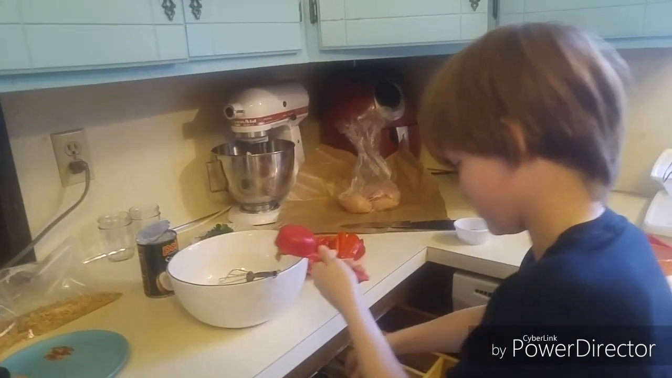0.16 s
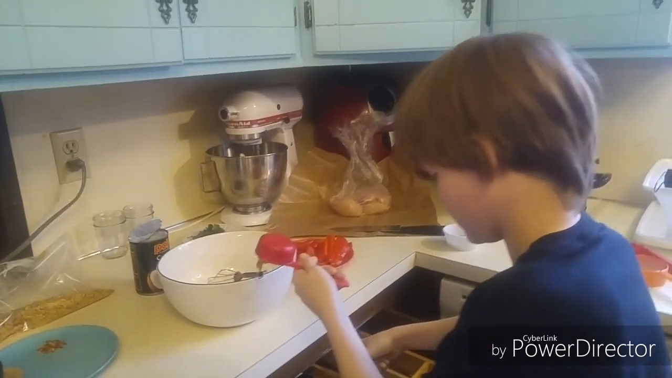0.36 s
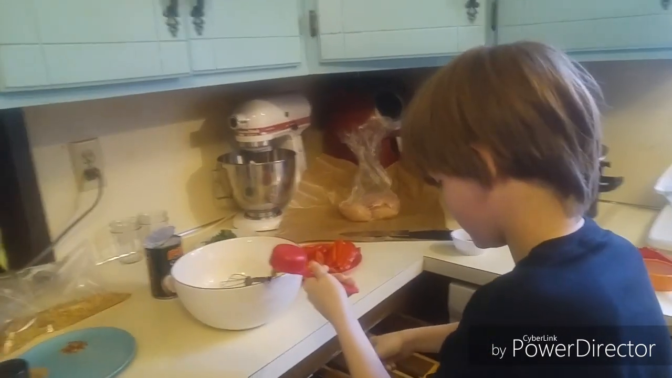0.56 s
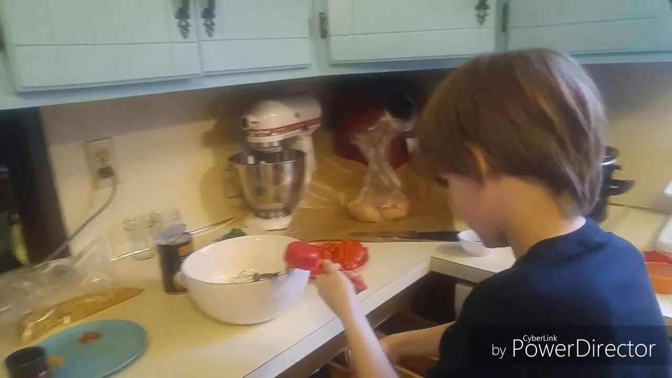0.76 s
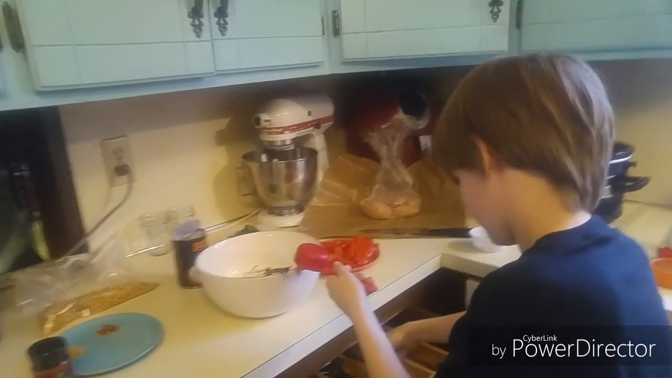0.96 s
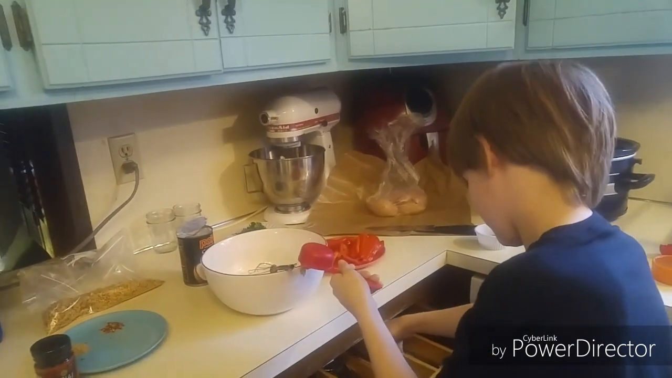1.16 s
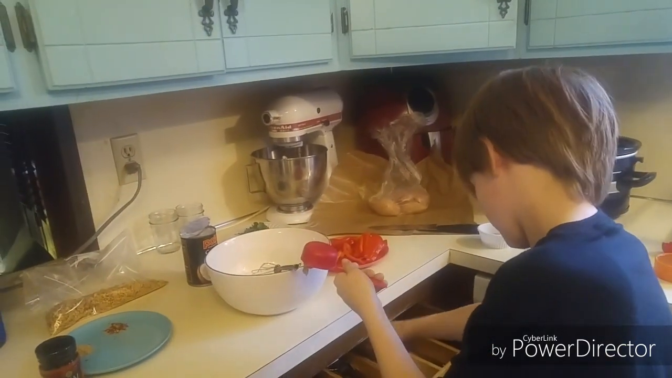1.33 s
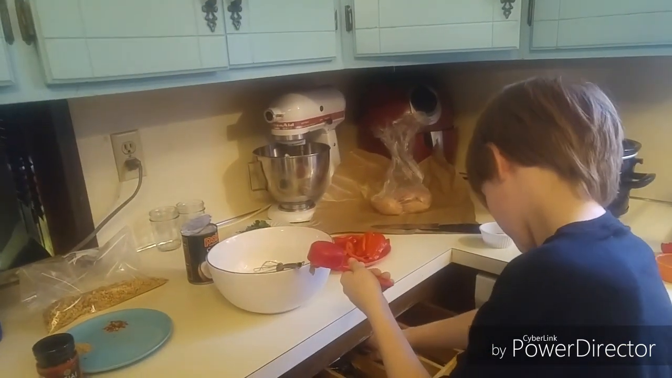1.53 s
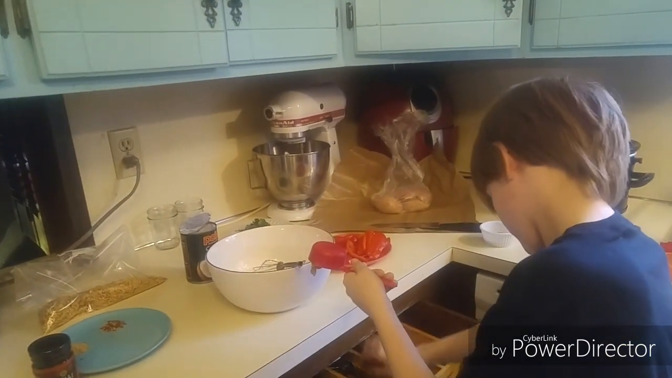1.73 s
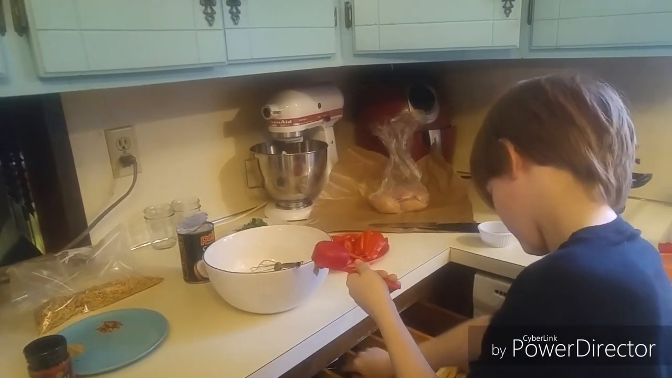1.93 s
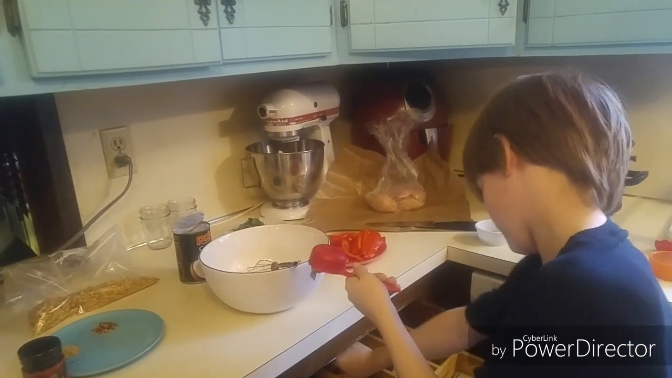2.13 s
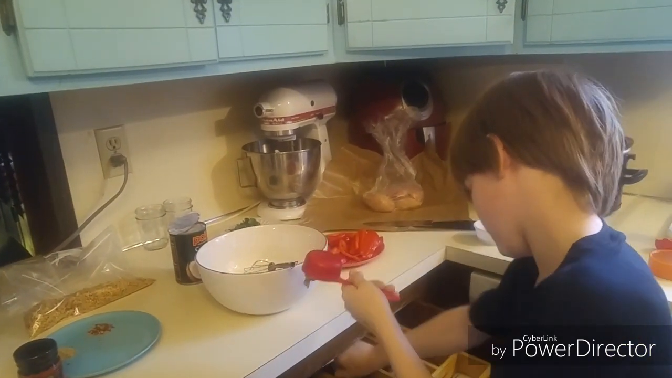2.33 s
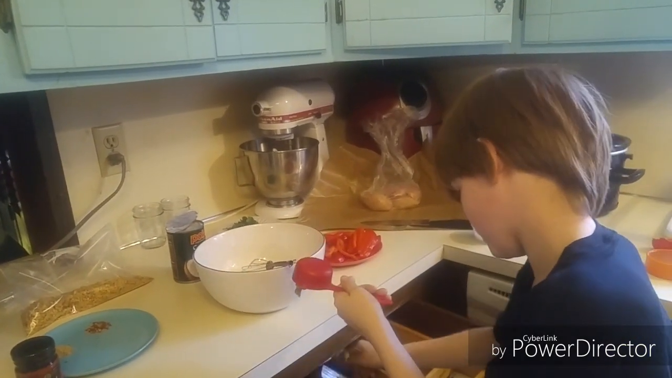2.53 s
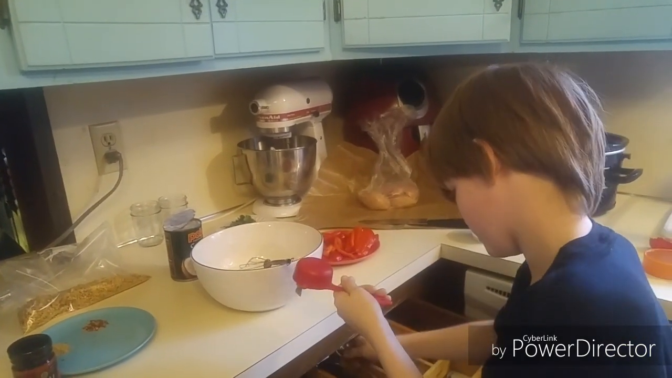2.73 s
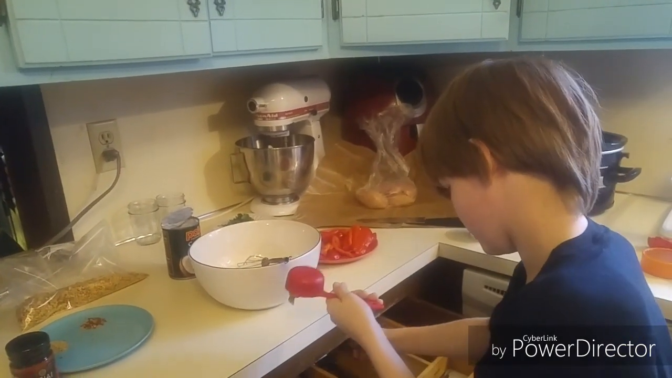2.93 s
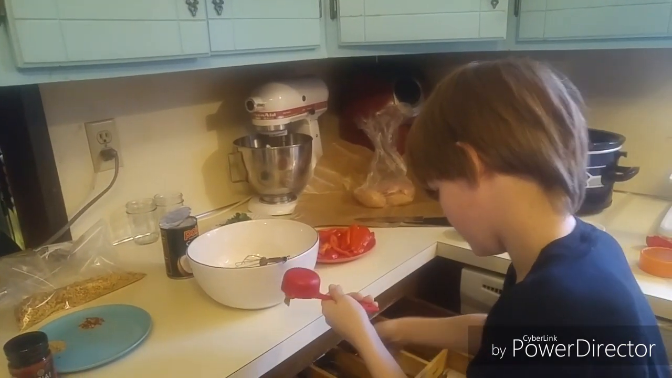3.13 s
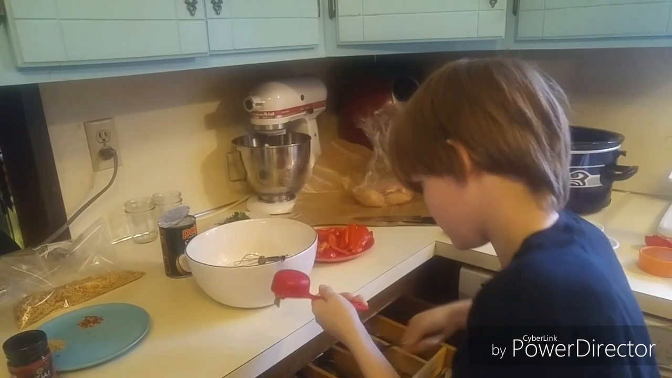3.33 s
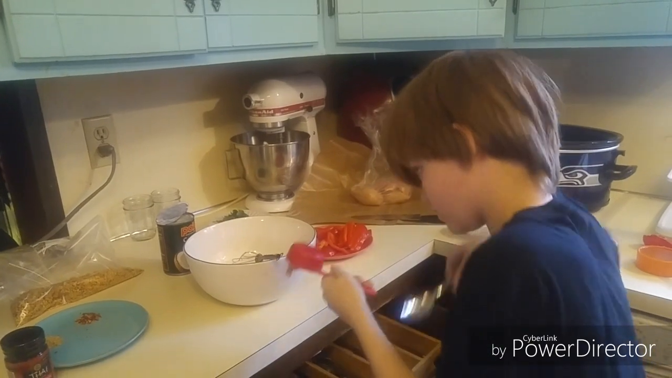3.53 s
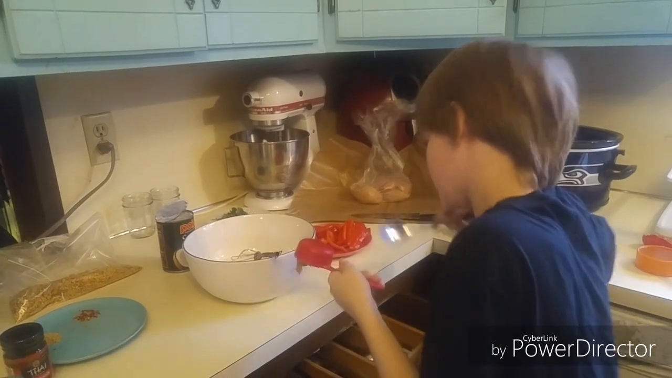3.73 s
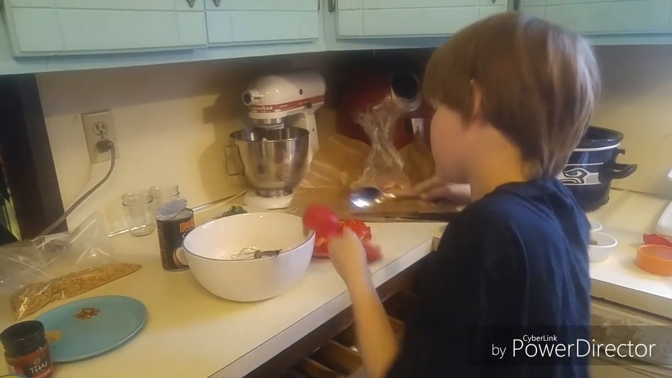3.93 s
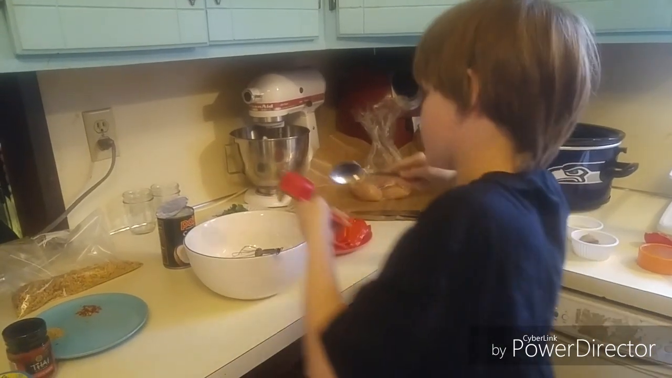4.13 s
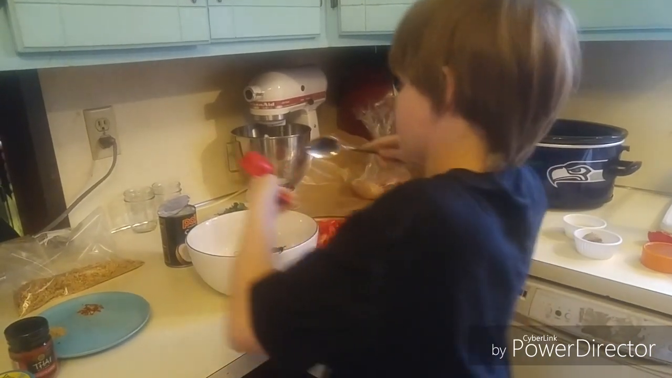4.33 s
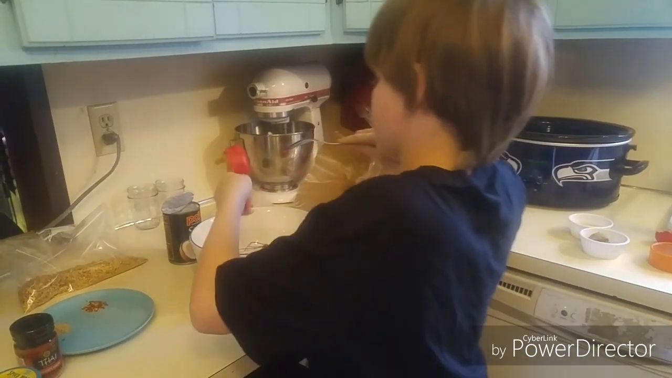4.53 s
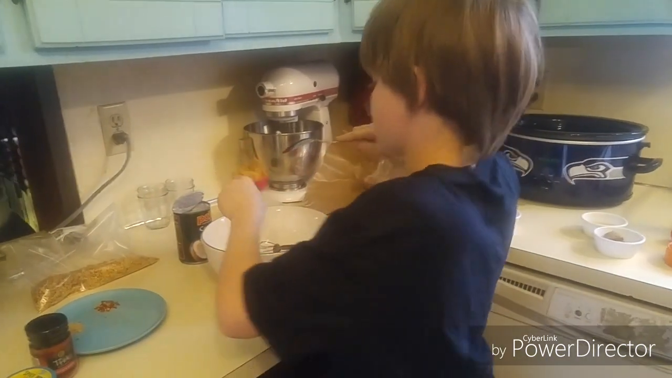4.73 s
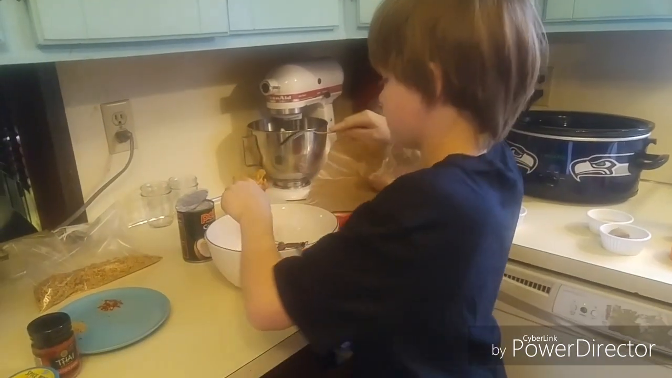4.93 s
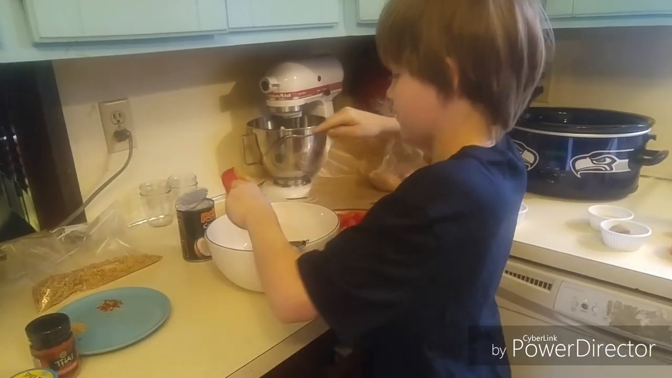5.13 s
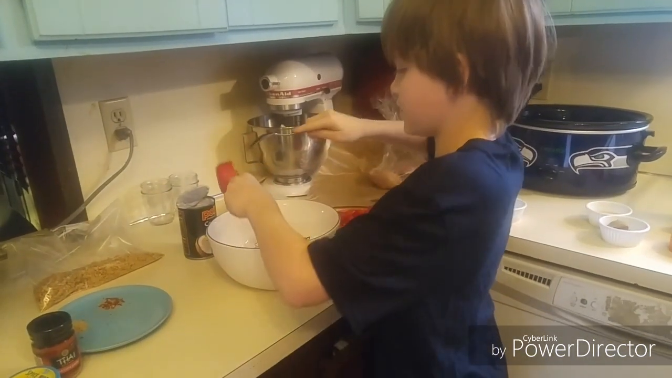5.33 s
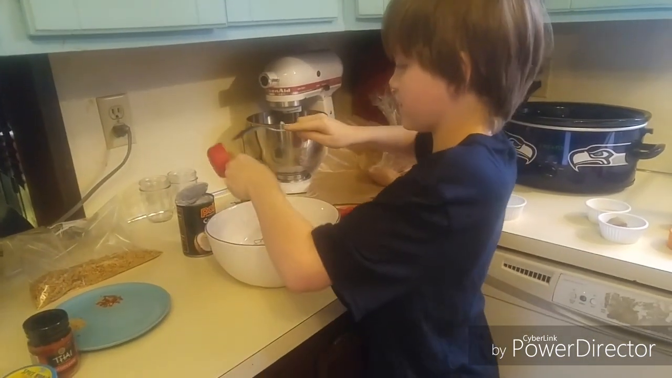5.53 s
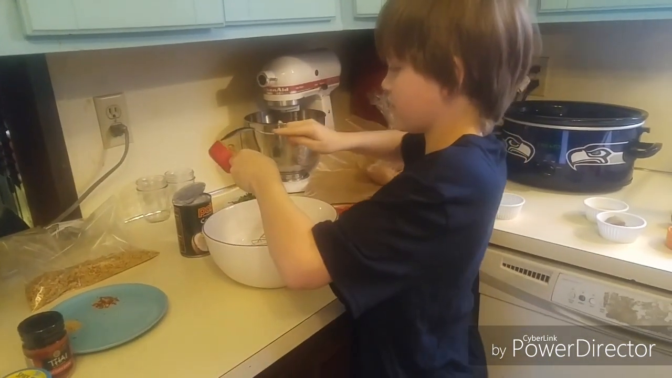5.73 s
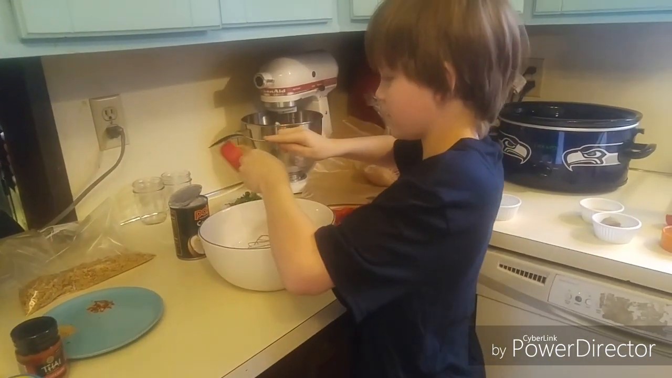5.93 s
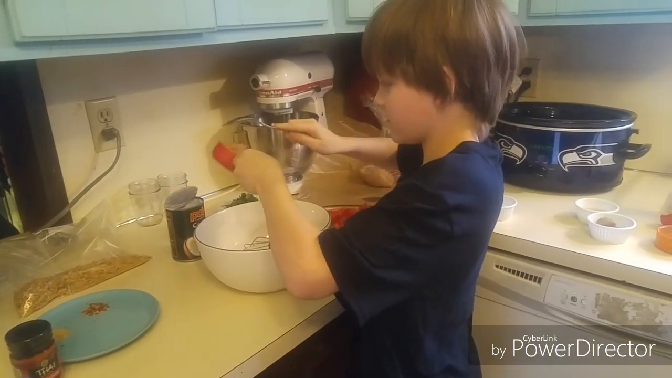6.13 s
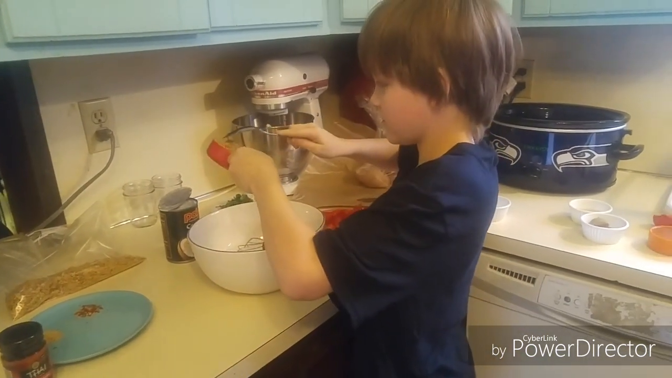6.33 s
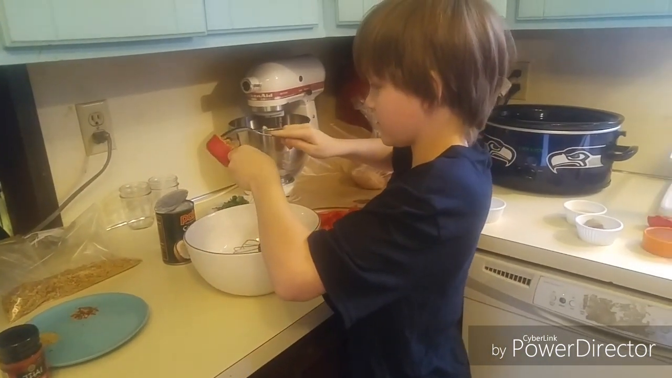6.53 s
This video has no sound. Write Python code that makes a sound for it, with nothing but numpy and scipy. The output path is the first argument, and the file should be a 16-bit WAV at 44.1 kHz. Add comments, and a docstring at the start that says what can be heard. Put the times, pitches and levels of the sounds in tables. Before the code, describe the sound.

In a quiet kitchen, utensils bump a wooden drawer tray with sparse dull clacks, then cutlery crashes together in bright, dense, irregular clinks and short jingles. A spoon touches its neighbours and rings out thinly. The drawer then rumbles and groans softly on its runners, its contents shivering, and after a short lull knocks shut. Close, natural stereo pickup with little room echo.

```python
"""One hears utensils bump a wooden drawer's tray, cutlery slide and clink, and a spoon ring faintly.
Then the drawer rumbles and groans along its runners and at last knocks shut, over a quiet kitchen.
Struck bodies are bursts of coloured noise (dense modes) with decaying sines (distinct modes).
Most noise bursts join two decays, a crack and a tail; the box's crack outlasts its tail.
Sliding cutlery is many tiny clinks; the runners are rough noise and a gliding tone, led by speed."""
import sys
import numpy as np
from scipy import signal
from scipy.fft import rfft, irfft
from scipy.io import wavfile

SR = 44100
rng = np.random.default_rng(int(sys.argv[2]) if len(sys.argv) > 2 else 0)


def transcribe(signal):
    """Save signal, clipped to [-1, 1], as a 16-bit WAV file at the path in sys.argv[1]."""
    frames = np.atleast_2d(signal).T
    limited = np.clip(frames, -1, 1)
    pcm = np.round(limited * 32767).astype(np.int16)
    wavfile.write(sys.argv[1], SR, pcm)


N = 289737
TIME = np.arange(N) / SR
AGE = TIME[:SR // 2]   # seconds since a contact


# Utensils bump the tray or the drawer's wall. Each row: start in seconds, then the levels
# of cutlery, tray clack and drawer box in dB.
BUMPS = [(0.182, -30.5, -35, -42), (0.368, -45.5, -22, -26.5), (0.388, -48.5, -23, -26.5),
         (0.615, -32, -23.5, -43.5), (0.809, -51, -21, -25), (0.83, -27.5, -20, -22),
         (0.838, -27, -20.5, -22.5), (0.981, -49.5, -42, -32), (1.019, -40, -33.5, -42.5),
         (1.091, -35.5, -32.5, -32), (1.337, -54.5, -43, -52), (1.405, -22.5, -12, -22),
         (1.528, -52, -28, -37.5), (1.775, -17, -30, -22.5), (3.017, -44.5, -29, -45.5),
         (3.139, -22.5, -17, -27), (3.329, -48.5, -32, -36.5), (3.434, -41.5, -43, -44.5),
         (4.134, -36, -42.5, -30.5), (5.842, -46.5, -42.5, -33)]
# Cutlery drops on cutlery. Each row: start in seconds, level in dB, brightness in dB per octave.
CLINKS = [(0.001, -27.5, -1), (0.066, -39, 1), (0.138, -29.5, 3.5), (1.105, -35.5, -0.5),
          (1.555, -13.5, 1.5), (1.751, -7.5, 1.5), (2.194, -46, -2.5), (2.288, -34.5, -3), (2.391, -25, -1),
          (2.437, -18.5, 0.5), (2.456, -12, 1), (2.59, -22, 7.5), (2.615, -9.5, 4), (2.629, -16, 0),
          (2.699, -16, 5.5), (2.743, -18, 6.5), (2.798, -14.5, 6), (2.848, -26.5, 1.5), (2.934, -25, 13),
          (3.048, -20.5, 0.5), (3.065, -13.5, 5.5), (3.082, -19.5, 1), (3.245, -14, -1), (3.49, -40.5, 4),
          (3.505, -34.5, 0), (4.207, -33.5, -4), (4.231, -23.5, 0.5), (4.315, -29.5, -6.5),
          (4.41, -32.5, -5), (4.515, -34.5, -1), (4.747, -41.5, -4)]
BUMP_TILT_DB = -6.5   # per octave: cutlery shaken through the wood sounds darker
TRAY_UNDER_DB, BOX_UNDER_DB = -12, -14.5   # tray and box answer a clink this much more softly


def rummaging():
    """Coupled bodies: bumps and drops excite metal and wood, the wood less the brighter the clink."""
    out = np.zeros((2, N))
    for start_s, metal_db, tray_db, box_db in BUMPS:
        add(out, start_s, contact(metal_db, tray_db, box_db, BUMP_TILT_DB))
    for start_s, metal_db, tilt_db in CLINKS:
        wood_db = metal_db - tilt_db
        add(out, start_s, contact(metal_db, wood_db + TRAY_UNDER_DB, wood_db + BOX_UNDER_DB, tilt_db))
    return out


DULLEST_HZ, SOFT_RISE_S = 1490, 0.0041   # softest contact: upper edge, time constant of pressing in
CRACK_DB, CRACK_SLOPE = 9, 0.16   # crack at 0 dB of metal, and dB of crack gained per dB softer


def contact(metal_db, tray_db, box_db, tilt_db):
    """Contact stiffness: contacts with little metal for their wood sound dull and swell slowly."""
    # the wood's upper edge doubles for every 14 dB more metal relative to the box
    hardness_db = metal_db - box_db + tilt_db - BUMP_TILT_DB
    edge_hz = np.clip(3700 * 2 ** (hardness_db / 14), DULLEST_HZ, 8000)
    wood = balance(from_db(tray_db) * clack(), left_db=-3.0) + from_db(box_db) * thud()
    wood = signal.sosfilt(signal.ellip(5, 1, 28, edge_hz, fs=SR, output="sos"), wood)
    press = 1 - np.exp(-AGE / SOFT_RISE_S * (edge_hz / DULLEST_HZ) ** 5)
    # the lighter the touch, the more it is all tick
    metal = clink(tilt_db, CRACK_DB - CRACK_SLOPE * metal_db)
    return from_db(metal_db) * metal + wood * press


# Strongest partials of forks and spoons. Each row: frequency in Hz, relative level in dB.
CUTLERY_MODES = [(6517, -8), (6719, -4), (7203, -2), (7440, -12), (7872, -8), (8254, -2), (9075, 1.5),
                 (9410, -7), (10752, -11), (11278, -8.5), (12176, -11.5), (13369, -10.5)]
# Their countless weaker partials. Each row: frequency in Hz, relative density in dB per Hz.
CUTLERY = [(1500, -11.5), (4300, -9), (5200, -6), (6900, 0), (9000, -3), (11500, -9), (12800, -13.5),
           (14500, -13.5), (16000, -27.5)]


def clink(tilt_db, crack_db, ripple_db=10, tail_t60=0.32):
    """Damped modal ringing: a bright crash, the heap's usual partials and some of the piece's own."""
    crash = blow(tilted(CUTLERY, tilt_db), rise_s=0.0024, crack_db=crack_db, crack_t60=0.0073,
                 tail_t60=tail_t60, ripple_db=ripple_db, ripple_hz=172.8)
    own_hz = rng.uniform(2500, 15000, size=12)
    own = [(hz, 1 + 20 * np.log10(at_hz(CUTLERY, hz))) for hz in own_hz]
    modes = [(hz, db, 0.17) for hz, db in tilted(CUTLERY_MODES + own, tilt_db)]   # t60 in s
    ring = partials(modes, spread_db=4, width=1)
    return from_db(-3.0) * crash + from_db(-4) * ring


# Dense modes of the tray. Each row: frequency in Hz, relative density in dB per Hz.
TRAY = [(480, -13.5), (800, -2.5), (1300, 0), (2000, -1), (2500, -16.5), (3300, -17.5), (4500, -22)]
# Distinct resonances of the tray. Each row: frequency in Hz, relative level in dB.
TRAY_MODES = [(1075, 5.5), (1174, 3.5), (1300, -0.5), (1950, -4.5)]


def clack():
    """Impact on a light panel: the cutlery tray gives a hard crack, then a faint ring."""
    body = blow(TRAY, rise_s=0.0014, crack_db=13, crack_t60=0.017, tail_t60=0.22,
                ripple_db=14, ripple_hz=94.25)
    ring = partials([(hz, db, 0.3) for hz, db in TRAY_MODES], spread_db=-0.5, width=0.9)
    return body + from_db(-9) * ring


# Dense modes of the drawer box. Each row: frequency in Hz, relative density in dB per Hz.
BOX = [(170, -18.5), (250, -17.5), (350, 1), (510, -9), (600, -2), (740, 0.5), (900, -5), (2500, -26.5)]
# Distinct resonances of the box. Each row: frequency in Hz, relative level in dB.
BOX_MODES = [(360, 1), (400, 1), (615, 3), (727, 1.7), (758, 7)]


def thud():
    """Forced response of a larger body: the wooden box answers beneath, at lower modes."""
    body = blow(BOX, rise_s=0.0015, crack_db=10.5, crack_t60=0.26, tail_t60=0.17,
                ripple_db=6.5, ripple_hz=45.2)
    ring = partials([(hz, db, 0.21) for hz, db in BOX_MODES], spread_db=3.0, width=0.18)
    return body + from_db(-4) * ring


# A piece lies free for a moment and one partial sings out.
# Each row: start in seconds, frequency in Hz, level in dB.
PINGS = [(0.001, 6700, -29), (0.391, 1317, -29), (0.615, 5640, -29), (0.615, 10600, -35.5),
         (1.406, 3133, -29.5), (2.83, 13300, -31.5), (2.934, 10200, -35), (3.068, 8130, -15.5),
         (4.516, 5400, -34), (4.516, 7230, -24.5)]
PING_T60_S, PING_REFERENCE_HZ = 0.11, 8000   # ring time at this pitch


def pings():
    """Frequency-dependent damping: single partials ring clear, low ones for longer."""
    out = np.zeros((2, N))
    for start_s, hz, db in PINGS:
        t60 = PING_T60_S * np.sqrt(PING_REFERENCE_HZ / hz)
        add(out, start_s, from_db(db) * tone(hz, t60))
    return out


# Cutlery jingles on for a while, pushed by the hand or shaken as the drawer knocks shut.
# Each row: start in seconds, length in seconds, jingle level in dB.
STIRS = [(0.144, 0.097, -29.5), (1.574, 0.09, -24.5), (1.713, 0.034, -22.5), (2.383, 0.028, -25),
         (2.46, 0.14, -21.5), (2.638, 0.25, -22.5), (2.915, 0.25, -34.5), (3.082, 0.1, -23),
         (4.553, 0.066, -40), (5.843, 0.035, -40)]
STIR_ATTACK_S, STIR_SAG_DB_PER_S, STIR_RELEASE_T60_S = 0.0027, 8, 0.14


def stirring():
    """Sustained excitation: the stirred heap's jingle starts quickly, slackens and dies away."""
    level = np.zeros(N)
    for start_s, length_s, db in STIRS:
        age = np.maximum(TIME - start_s, 0)
        attack = np.minimum(age / STIR_ATTACK_S, 1)
        release = from_db(-60 * np.maximum(age - length_s, 0) / STIR_RELEASE_T60_S)
        level += from_db(db - STIR_SAG_DB_PER_S * age) * attack * release
    return jingle(level, per_s=125, spread_db=8, wood_db=-12.0, tilt_db=-0.5)


# The tray under sliding cutlery. Each row: frequency in Hz, relative density in dB per Hz.
RATTLE = [(70, -16), (350, -9.5), (500, -19.5), (750, 0), (1200, -4), (3000, -19.5)]


def jingle(level, per_s, spread_db, wood_db, tilt_db, count=12):
    """Stick-slip as a random pulse train: many tiny clinks; now one utensil leads, now another."""
    out = np.zeros((2, N))
    shares = np.array([from_db(8 * drift(16)) for _ in range(count)])
    shares = shares / np.sqrt(np.sum(shares ** 2, axis=0))   # the total power stays even
    for share in shares:
        strength = from_db(spread_db * rng.uniform(-1, 1, N))
        slips = (rng.random(N) < per_s / count / SR) * strength
        wood = blow(RATTLE, rise_s=0.00013, crack_db=-1.5, crack_t60=0.23, tail_t60=0.36,
                    ripple_db=20.5, ripple_hz=75.04)
        metal = clink(tilt_db, ripple_db=17.0, crack_db=4.5, tail_t60=0.21)
        piece = metal + from_db(wood_db) * wood
        piece = piece / np.sqrt(np.sum(piece ** 2) / 2)   # unit energy
        train = rms_one(slips)[None] * level * share
        out += signal.oaconvolve(train, piece, axes=1)[:, :N]
    return out


# Partials of the lifted spoon. Each row: frequency in Hz, relative level in dB.
SPOON_MODES = [(1324, -9), (2363, -9), (3626, -6), (5064, 2), (6705, -4), (6800, -8), (8544, -1),
               (8711, -8), (9510, -11)]
# The spoon touches its neighbours on the way out. Each row: start in seconds, level in dB.
SPOON_TAPS = [(3.592, -48.5), (3.661, -24.5)]
SPOON_T60_S = 0.19   # while it touches
FREE_RING_DB, FREE_RING_T60_S = -10, 0.45   # once it is clear


def spoon():
    """Contact damping: a touching spoon buzzes and dies; lifted clear, it rings on faintly, beating."""
    out = np.zeros((2, N))
    for start_s, tap_db in SPOON_TAPS:
        sound = from_db(-10) * clink(0, 0)
        for hz, level_db in SPOON_MODES:
            buzz = np.array([drift(200)[:len(AGE)] for _ in range(2)])
            beat = np.array([drift(45)[:len(AGE)] for _ in range(2)])
            damped = from_db(7 * buzz) * tone(hz, SPOON_T60_S)
            free = from_db(FREE_RING_DB) * (beat + 0.5) * tone(hz, FREE_RING_T60_S)
            sound = sound + from_db(level_db) * (damped + free)
        add(out, start_s, from_db(tap_db) * sound)
    return out


PUSH_START_S, PUSH_LENGTH_S = 3.785, 1.155


def push_speed():
    """Kinematics of one push: the drawer's speed, 0 to 1, swells and falls in a half-sine arch."""
    return np.sin(np.pi * np.clip((TIME - PUSH_START_S) / PUSH_LENGTH_S, 0, 1))


# Rubbing noise of the runners. Each row: frequency in Hz, relative density in dB per Hz.
RUNNERS = [(65, -1), (160, -3.5), (330, 2), (500, -9.5), (670, 3), (900, -6.5), (4000, -28.5)]
RUMBLE_DB, RUMBLE_POWER = -36, 1.27   # at full speed; level grows with this power of the speed
GROAN_DB, GROAN_POWER = -32, 2.1
GROAN_HZ, GROAN_START_HZ, GROAN_SETTLE_S = 281, 373.6, 0.24   # the groan sinks as the runners free up
CATCH_S, CATCH_LENGTH_S, CATCH_DB = 4.35, 0.017, -21.5   # midway the runners catch, the groan swells
SHIVER_DB, SHIVER_POWER, JOLT_S = -36, 3.8, 4.14   # once jolted loose, the cutlery shivers


def sliding():
    """Friction: runners rub unevenly, the box groans in fits, cutlery shivers, all led by the speed."""
    speed = push_speed()
    rough = from_db(6 * drift(60)) * coloured(RUNNERS, size=N)
    rub = from_db(RUMBLE_DB) * speed ** RUMBLE_POWER * rms_one(rough)

    tight = np.exp(-np.maximum(TIME - PUSH_START_S, 0) / GROAN_SETTLE_S)
    wobble_hz = 34 * drift(130)
    pitch_hz = GROAN_HZ + (GROAN_START_HZ - GROAN_HZ) * tight + wobble_hz
    catch = from_db(CATCH_DB) * np.exp(-((TIME - CATCH_S) / CATCH_LENGTH_S) ** 4)
    grip = 1 + drift(40)
    groan_level = from_db(GROAN_DB) * speed ** GROAN_POWER * grip + catch
    groan = groan_level * np.sin(2 * np.pi * np.cumsum(pitch_hz) / SR)

    shiver_level = from_db(SHIVER_DB) * speed ** SHIVER_POWER * (TIME > JOLT_S)
    # a narrow spread: the tiny clinks of the shiver are much alike
    shiver = jingle(shiver_level, per_s=240, spread_db=5, wood_db=-3.5, tilt_db=-1.5, count=6)
    return balance(rub + groan, left_db=-1.5) + shiver


# The whole drawer bumps its cabinet. Each row: start in seconds, level in dB.
KNOCKS = [(1.779, -32.5), (3.659, -33), (3.682, -33), (4.134, -30.5), (4.316, -29), (5.829, -39),
          (5.848, -22), (5.868, -30), (5.945, -46), (6.004, -47)]
# Dense modes of the cabinet. Each row: frequency in Hz, relative density in dB per Hz.
CABINET = [(55, -7), (135, -5), (200, 0), (380, -1), (510, -13), (630, -4.5), (800, -11.5), (1800, -31.5)]
# Its two main resonances. Each row: frequency in Hz, relative level in dB, t60 in seconds.
CABINET_MODES = [(372, 2.5, 0.073), (663, -3, 0.38)]


def knocks():
    """Impact of heavy bodies: deep blows of wood on wood that fade from a strong crack."""
    out = np.zeros((2, N))
    for start_s, db in KNOCKS:
        body = blow(CABINET, rise_s=0.003, crack_db=13.5, crack_t60=0.11, tail_t60=0.51,
                    ripple_db=8.5, ripple_hz=45.8)
        ring = partials(CABINET_MODES, spread_db=2, width=0.3)
        add(out, start_s, from_db(db) * (body + from_db(-7) * ring))
    return out


# One small dry tick after the push. Each row: frequency in Hz, relative density in dB per Hz.
TICK = [(700, 7), (1800, -15), (7000, -17)]
TICK_S, TICK_DB = 5.027, -42


def tick():
    """Heavily damped impact: a light, hard touch with hardly any ring."""
    out = np.zeros((2, N))
    add(out, TICK_S, from_db(TICK_DB) * coloured(TICK, len(AGE)) * dying(0.06))
    return out


# Colour of the kitchen background. Each row: frequency in Hz, relative density in dB per Hz.
HUSH = [(70, 3.5), (150, -3.5), (380, -0.5), (500, -11.5), (700, 1), (1100, -8), (3500, -18.5), (8000, -12),
        (16000, -33)]
# Its course. Each row: time in seconds, level in dB.
HUSH_LEVEL = [(0, -63), (0.5, -56.5), (2.2, -55.5), (4, -50.5), (5.8, -56.5), (6.3, -63), (6.57, -63)]


def hush():
    """Stationary noise under a slow envelope: the quiet of the kitchen."""
    times_s, levels_db = np.transpose(HUSH_LEVEL)
    return from_db(np.interp(TIME, times_s, levels_db)) * coloured(HUSH, size=N)


ONSET = 800   # samples over which the strength of a blow is reckoned


def blow(spectrum, rise_s, crack_db, crack_t60, tail_t60, ripple_db, ripple_hz):
    """Double decay of dense modes: a crack and a tail, joined by power; rms 1 over the onset."""
    decay = np.hypot(from_db(crack_db) * dying(crack_t60), dying(tail_t60))
    rise = 1 - np.exp(-AGE / rise_s)
    sound = coloured(spectrum, len(AGE), ripple_db, ripple_hz) * decay * rise
    return sound / np.sqrt(np.mean(sound[:, :ONSET] ** 2))


def partials(modes, spread_db, width):
    """Modal superposition: decaying sines, weighted by where the body is hit and heard; rms 1 at first."""
    hz, db, t60 = np.transpose(modes)
    count = len(hz)
    # one draw shared by both channels, and one for each, scaled by the width
    where = rng.uniform(-8.0, 1, count) + width * rng.uniform(-0.14, 1, (2, count))
    gain = from_db(db + spread_db * where)
    gain = gain / np.sqrt(np.sum(gain ** 2) / 4)
    phase = np.pi * (rng.uniform(-0.57, 1, count) + width * rng.uniform(-1.39, 1, gain.shape))
    turn = np.outer(2 * np.pi * hz, AGE).astype(np.float32)
    decay = np.exp(np.outer(-np.log(1000) / t60, AGE).clip(-30).astype(np.float32))
    sines = (gain * np.cos(phase)) @ (decay * np.sin(turn))
    cosines = (gain * np.sin(phase)) @ (decay * np.cos(turn))
    return sines + cosines


def tone(hz, t60):
    """A single damped mode: one partial ringing alone."""
    return partials([(hz, 0, t60)], spread_db=0, width=0.4)


def dying(t60):
    """Exponential free decay, 60 dB in t60 seconds."""
    return from_db(-60 * AGE / t60)


# Stereo width. Each row: frequency in Hz, level of the side signal relative to the middle in dB.
WIDTH = [(400, -9), (1000, -4), (2000, -1), (13000, -0.6)]


def coloured(spectrum, size, ripple_db=0, ripple_hz=90):
    """Spectral shaping of stereo noise; crowded modes ripple it with peaks and gaps; rms 1."""
    hz = np.maximum(np.fft.rfftfreq(size, 1 / SR), 1)
    low_skirt = np.minimum(hz / spectrum[0][0], 1) ** 2
    high_skirt = np.minimum(spectrum[-1][0] / hz, 1) ** 2
    ripple = np.interp(hz / ripple_hz, np.arange(1024), rng.uniform(-1, 1, size=1024))
    shape = at_hz(spectrum, hz) * low_skirt * high_skirt * from_db(ripple_db * ripple)
    mid, side = rfft(rng.standard_normal((2, size))) * shape
    side = side * at_hz(WIDTH, hz)
    return rms_one(irfft(np.array([mid + side, mid - side]), size))


def drift(per_s):
    """Slow random modulation: a value wandering between -1 and 1, with per_s new targets a second."""
    knots = rng.uniform(-1, 1, size=4096)
    return np.interp(TIME * per_s, np.arange(len(knots)), knots)


def tilted(points, tilt_db):
    """Spectral tilt: lean a spectrum about 8 kHz by so many dB per octave."""
    return [(hz, db + tilt_db * np.log2(hz / 8000)) for hz, db in points]


def at_hz(points, hz):
    """Interpolated gain of a spectrum, read on a log-frequency axis."""
    f, db = np.transpose(points)
    return from_db(np.interp(np.log(hz), np.log(f), db))


def from_db(db):
    """Logarithmic level: decibels to gain."""
    return 10 ** (np.asarray(db) / 20)


def rms_one(x):
    """Power normalisation: scale to unit rms."""
    return x / np.sqrt(np.mean(x ** 2) + 1e-20)


def balance(x, left_db):
    """Level difference between channels: left over right; a negative value leans right."""
    return x * from_db([[left_db / 2], [-left_db / 2]])


def add(out, start_s, sound):
    """Superposition: mix a sound in from its start time."""
    start = max(round(start_s * SR), 0)
    out[:, start:start + sound.shape[1]] += sound[:, :N - start]


def scene():
    """Superposition of everything in the drawer over the quiet of the kitchen."""
    drawer = rummaging() + pings() + stirring() + spoon() + sliding() + knocks() + tick()
    return drawer + hush()


CUTOFF_HZ = 15600


def record(dry):
    """Band limits and saturation: less bass on the left, rounded peaks, the top cut."""
    left = signal.sosfilt(signal.butter(1, 160, "high", fs=SR, output="sos"), dry[0])
    rounded = 1.1 * np.tanh(np.array([left, dry[1]]) / 1.1)
    return signal.sosfilt(signal.ellip(10, 0.1, 80, CUTOFF_HZ, fs=SR, output="sos"), rounded)


dry = scene()
out = record(dry)
transcribe(out)
```